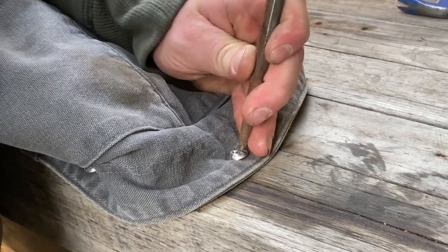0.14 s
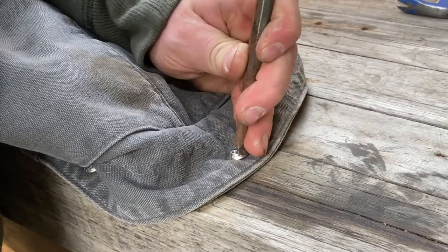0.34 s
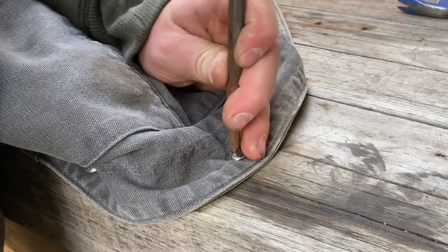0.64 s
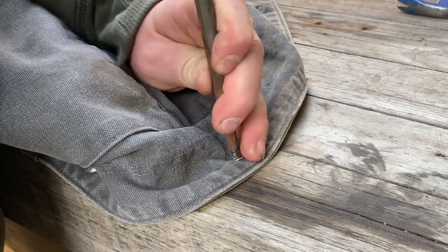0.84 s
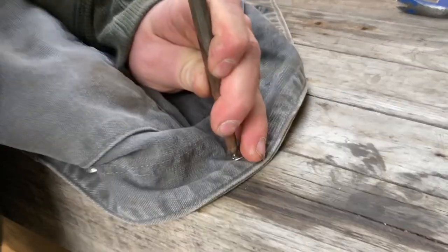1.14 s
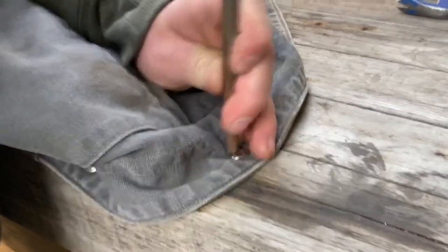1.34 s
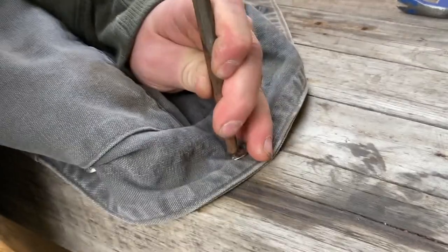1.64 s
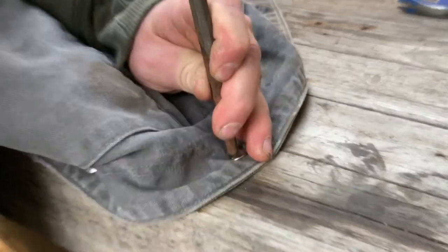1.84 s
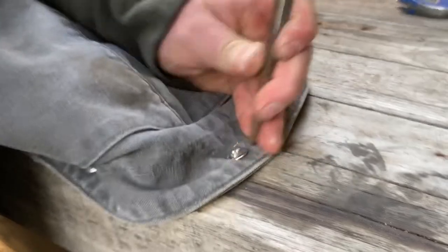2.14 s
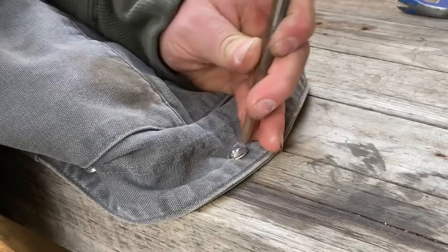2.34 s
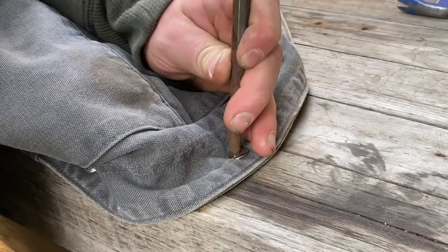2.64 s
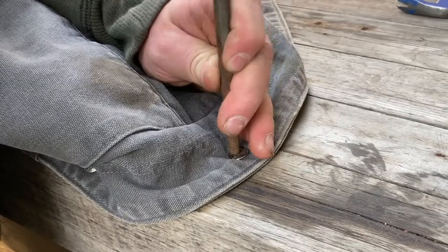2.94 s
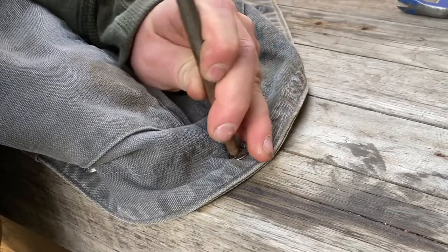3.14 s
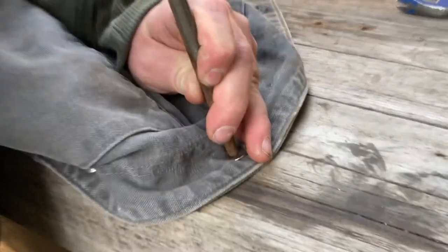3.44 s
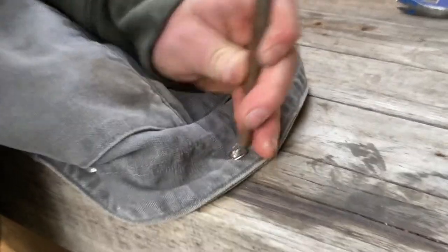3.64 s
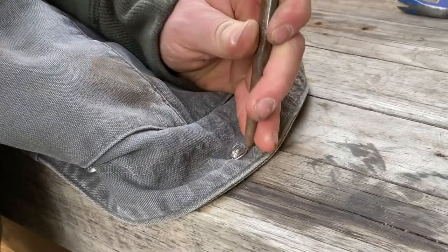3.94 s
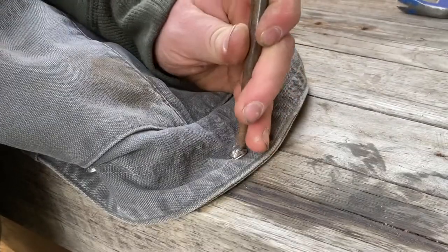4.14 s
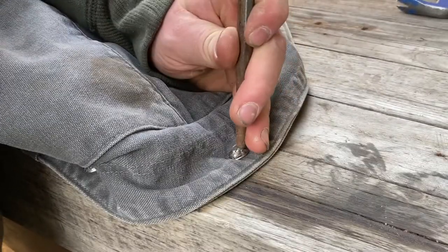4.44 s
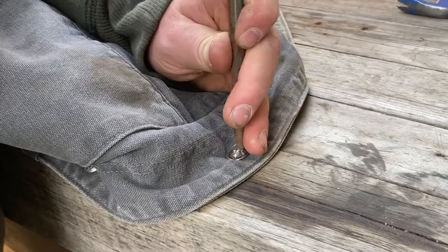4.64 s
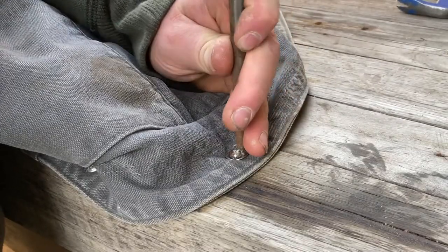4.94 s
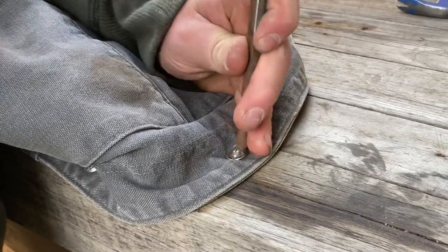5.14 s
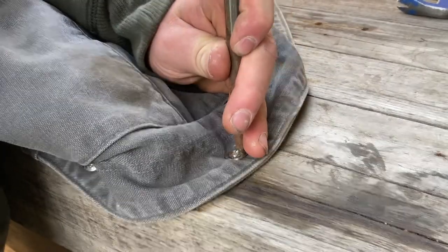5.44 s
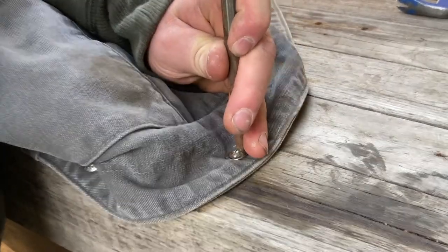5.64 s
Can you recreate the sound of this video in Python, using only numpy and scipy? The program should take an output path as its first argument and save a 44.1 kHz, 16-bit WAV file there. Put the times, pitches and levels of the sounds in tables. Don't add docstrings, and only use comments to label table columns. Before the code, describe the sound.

A quiet open-sided work space: faint far rumble and thin airy wash, with light cloth scraping at the very start and a small dull knock at 0.08 s. At 0.99 s a hammer cracks on a steel punch, bright and dry, with a low plank thud right behind it and short echoes; a light rebound and tiny rattling ticks follow around 1.12-1.2 s. More hard blows fall at 1.32, 1.70 and 1.98 s, the latter pair with fuller wooden boom. Soft finger and fabric brushes follow, with faint punch-setting ticks near 2.67 s. At 3.26 s a blow rings longest, a choked one answers at 3.51 s, and a faint tick comes at 3.75 s. A long quiet gap holds barely audible brushes. A weaker tap at 5.14 s rebounds immediately, then firm blows land at 5.45 and 5.73 s, the last the sharpest, its tail cut by the end.

```python
import sys
import numpy as np
from scipy import signal
from scipy.fft import rfft, irfft
from scipy.io import wavfile
from scipy.ndimage import uniform_filter1d

SR = 44100
rng = np.random.default_rng(int(sys.argv[2]) if len(sys.argv) > 2 else 0)


def nominal_scale(level):
    x = np.asarray(level, float) / 20
    return 10 ** x


def materialize(psi):
    bounded = np.clip(np.atleast_2d(psi).T, -1, 1)
    quanta = np.round(bounded * 32767).astype(np.int16)
    wavfile.write(sys.argv[1], SR, quanta)


N = 255339

# (frequency [Hz], density [dB per Hz])
RUMBLE_SPECTRUM = [(12, -51.5), (30, -29.5), (46, -15.5), (67, 1), (101, -1), (129, -1), (167, -10.5),
                   (215, -9), (274, -24), (370, -32.5), (409, -34), (445, -28), (600, -33), (780, -65.5),
                   (1320, -120)]
# (frequency [Hz], density [dB per Hz])
WASH_SPECTRUM = [(150, -29.5), (250, -8), (340, -17), (380, -32), (481, -17.5), (763, -18.5), (1050, -17),
                 (2710, -36.5), (7000, -52), (9100, -81), (15400, -120)]
# (frequency [Hz], density [dB per Hz])
CLOTH_SPECTRUM = [(880, -32), (1500, -5.5), (2220, -1.5), (2480, -7), (2850, -5.5), (5750, -13),
                  (13500, -23.5), (14800, -28.5), (16500, -39)]
# (frequency [Hz], coherence [-1 to 1])
AIR_COHERENCE = [(60, 0.92), (150, 1), (300, 0.3), (640, -0.08), (1400, 0.012), (3100, 0.27)]
# (time [s], level [dB])
RUMBLE_LEVEL = [(0.0, -73.5), (0.2, -76), (0.45, -65.5), (1.1, -66), (1.7, -65.5), (2.3, -71.5), (2.6, -73),
                (3.2, -70), (4.1, -66), (4.45, -69), (5.2, -68), (5.79, -64.5)]
# (time [s], rustle level [dB])
RUSTLE_LEVEL = [(0.0, -81.5), (0.37, -92), (0.56, -97), (0.69, -91.5), (1.2, -93), (1.42, -91.5),
                (1.61, -93), (1.8, -86), (2.0, -89), (2.14, -85.5), (2.3, -101), (2.8, -105.5),
                (3.43, -102), (3.5, -85.5), (3.74, -102), (4.0, -105), (5.79, -104)]
# (frequency [Hz], width [Hz], level [dB])
SCRAPE_PEAKS = [(1523, 500, 7), (3400, 1300, -11), (8095, 330, 6.5), (10200, 2000, -10)]
# (time [s], level [dB])
SCRAPE_LEVEL = [(0.0, -68), (0.012, -74), (0.07, -73), (0.1, -91)]
# (time of crack [s], level [dB], band [Hz], band [Hz])
SWELLS = [(0.992, -49.5, 7300, 3800), (1.317, -51.5, 6670, 4490), (1.703, -56.5, 3680, 2510),
          (1.983, -56.5, 8040, 3200), (3.259, -64, 6490, 3520), (3.515, -61, 7340, 3903),
          (5.136, -79, 4686, 7000), (5.452, -63.5, 2896, 7800), (5.729, -62.5, 3105, 7500)]
# (frequency [Hz], t60 [s])
SHED_DECAY = [(200, 0.53), (700, 0.083), (2000, 0.2), (5000, 0.3), (12000, 0.56), (15000, .12)]
# (frequency [Hz], level [dB])
SHED_LEVEL = [(200, -25), (700, -3.5), (2000, -10.5), (5000, -21.5), (12000, -31), (16000, -22.5)]
# (frequency [Hz], level [dB])
SHED_ABSORPTION = [(8500, 0), (8800, -24), (9500, -24), (9800, 0), (12900, 0), (13300, -34), (14400, -32),
                   (14800, -2), (15300, -2), (15800, -30)]
# (time [s], level [dB], frequency [Hz], t60 [s], overtone level [dB])
KNOCKS = [(0.077, -45.5, 334, 0.037, -21), (1.117, -60, 7800, 0.012, -33), (1.117, -64, 5780, 0.0066, -30),
          (1.119, -63.5, 2700, 0.012, -34), (1.123, -60.5, 1790, 0.022, -30), (1.161, -63, 1440, 0.037, -1),
          (1.199, -61, 1340, 0.032, 1), (1.205, -56, 1397, 0.031, -18), (1.118, -73, 4050, 0.0086, -30),
          (1.122, -62.5, 1110, 0.02, -30), (3.753, -70, 1157, 0.022, -18), (1.122, -57, 402, 0.036, -9)]
# (time [s], level [dB], frequency [Hz], t60 [s])
BRUSHES = [(0.4424, -74, 10200, 0.06), (2.1397, -75, 10500, 0.14), (2.2994, -78.5, 11360, 0.13),
           (2.4194, -79.5, 4320, 0.038), (2.5491, -72, 4050, 0.058), (4.1744, -87, 3485, 0.036),
           (4.4344, -85, 4340, 0.038), (4.7194, -87, 3740, 0.046), (3.82, -84, 10000, 0.14)]
# (time [s], crack level [dB], boom level [dB], low steel mode [Hz], treble level [dB])
TOUCHES = [
    (1.1182, -65, -53.5, 5850, 8),
    (2.6664, -63.5, -75.5, 4170, -16),
    (3.7523, -60, -66.5, 4170, -4.5),
    (5.1569, -38.5, -52, 4500, 2.5),
]
# (time [s], crack level [dB], boom level [dB], punch ring level [dB], low steel mode [Hz])
BLOWS = [
    (0.9923, -17.5, -37, -27.5, 4720),
    (1.319, -18.5, -38, -38, 4800),
    (1.7031, -19, -32, -33, 5060),
    (1.9813, -18, -33.5, -37, 5916),
    (3.258, -20, -37.5, -22, 3700),
    (3.514, -17, -34, -40, 3705),
    (5.135, -28, -44.5, -37, 4830),
    (5.454, -20.5, -37.5, -33, 4610),
    (5.7301, -16, -33, -39.5, 3200),
]
# (start [s], high steel mode [Hz], levels near 2, 4.5 and 14 kHz against 8 kHz [dB x 3])
GRIPS = [(0.9, 8510, -9, -12, -5), (1.6, 7470, -4.5, -4.5, -4.5), (3.1, 7820, -14, -2.5, 1.5),
         (5.0, 6640, -7.5, -4, -0.5), (5.3, 6740, -8.5, -7.5, -3.5)]
GRIP_HZ = [2200, 4500, 8000, 14000]
# (frequency [Hz], level [dB], t60 [s], side of the node line [+-1])
BENCH_MODES = [(55.0, -24.3, 0.244, -1), (79.2, -10.9, 0.175, 1), (105.1, -2.6, 0.105, -1),
               (133.3, -18.8, 0.4, -1), (166.1, 0.0, 0.052, 1), (193.9, -26.9, 0.4, 1),
               (224.4, -7.1, 0.118, 1), (254.4, -1.9, 0.131, 1), (269.3, -14.6, 0.166, -1),
               (295.0, -8.2, 0.088, -1), (354.2, -17.1, 0.148, -1), (432.3, -10.9, 0.083, -1),
               (489.6, -31.5, 0.261, 1), (550.1, -14.1, 0.036, -1), (687.8, -19.2, 0.038, -1),
               (36, -17, .15, 1)]
# (frequency [Hz], level against the boom [dB], t60 [s])
PLANK_MODES = [(784, -23.5, 0.12), (1098, -14.5, 0.061), (1384, -12.5, .035), (2174, -2.5, 0.022)]
# (frequency [Hz], level [dB], t60 [s])
STEEL_MODES = [(2630, -3.5, 0.019), (3200, -0.5, 0.02), (3610, -1.5, 0.026), (4050, 3.5, 0.015),
               (4970, 0, 0.0011), (6700, -5, 0.0011), (7500, -8, 0.02), (8530, 2.5, 0.012),
               (10000, 4, 0.0084), (11000, -2, 0.011), (12624, 1, 0.01), (14845, 1, 0.0047)]
# (frequency [Hz], t60 [s])
PUNCH_MODE = (10590, 0.026)
# (frequency [Hz], level [dB])
LEFT_LEAN = [(300, 0.47), (1200, 2.5), (2500, 4.5), (5000, 7), (6500, 2.6)]

AIR_DB, AIR_SHARE = -86.5, 0.3
DUCK_DB, DUCK_AT_S, DUCK_WIDTH_S, DUCK_AIR_SHARE = -9.5, 0.14, 0.04, 0.27
GRID, GRID_START, OVERLAP = 1024, 100, 430
SWELL_BROAD_DB = 6
KNOCK_SCRAPE, BRUSH_SCRAPE, BRUSH_OVER_DB = 0.055, 1, -6.5
TOUCH_HIGH_HZ, TOUCH_LOW_DB, TOUCH_TOP_DB = 7100, -8, -5
CHOKE_S, CHOKE_T60_S, SPILL_DB = 0.0025, 0.005, -19.0
RING_SPILL_DB, KNOCK_SPILL_DB = -4.0, -5.0
LINGER_DB, LINGER_T60_S = -27.0, 0.057
STEER_S = 0.36
PORT_LAG = 9.7 / SR
HISS_DB, EDGE_HZ = -101, 16600


def evened(x):
    return x / np.sqrt(np.mean(x ** 2) + 1e-20)


def peaked(x):
    return x / (abs(x).max() + 1e-20)


def read(points, hz):
    f, value = np.transpose(points)
    return np.interp(np.log(hz + 1), np.log(f + 1), value)


def course(points, t, **ends):
    return np.interp(t, *np.transpose(points), **ends)


def add(mix, s, sound):
    part = mix[..., round(s * SR):][..., :sound.shape[-1]]
    part += sound[..., :part.shape[-1]]


def ring(modes, t, wave=np.sin):
    return sum(nominal_scale(db - 60 * t / max(t60, .002)) * wave(2 * np.pi * hz * t) for hz, db, t60 in modes)


def resonate(x, hz, width, passes):
    turn = np.exp(2j * np.pi * hz * np.arange(x.shape[-1]) / SR)
    r = np.exp(-np.pi * width / SR)
    for _ in range(passes):
        x = 2 * (turn * signal.lfilter([1 - r], [1, -r], x / turn)).real
    return x


def noise(spectrum, patchy_db, size):
    frames, hz = N // (size // 4) + 5, np.fft.rfftfreq(size, 1 / SR)
    a, b, c, d, patches = rng.standard_normal((frames, len(hz), 5)).T
    patches = uniform_filter1d(patches, size=6, axis=0)
    patches = evened(uniform_filter1d(patches, size=8, axis=1))
    coherence = np.clip(read(AIR_COHERENCE, hz), -1, 1)[:, None]
    left = a + 1j * b
    right = coherence * left + np.sqrt(1 - coherence ** 2) * (c + 1j * d)
    z = np.array([left, right]) * nominal_scale(read(spectrum, hz)[:, None] + patchy_db * patches)
    return evened(signal.istft(z, nperseg=size, noverlap=size - size // 4)[1][:, :N])


def cloth_scrape(t):
    hz = np.geomspace(300, 17000, 200)
    peaks = sum(nominal_scale(db) / np.sqrt(1 + (2 * (hz - f) / width) ** 4) for f, width, db in SCRAPE_PEAKS)
    scrape = noise(list(zip(hz, 20 * np.log10(peaks))), patchy_db=2.0, size=256)
    return scrape * nominal_scale(course(SCRAPE_LEVEL, t, right=-150) + 4.5)


def background():
    t = np.arange(N) / SR
    duck_db = sum(DUCK_DB * np.exp(-((t - blow[0] - DUCK_AT_S) / DUCK_WIDTH_S) ** 2) for blow in BLOWS)
    rumble_db = course(RUMBLE_LEVEL, t) + duck_db
    cloth_db = course(RUSTLE_LEVEL, t)
    air_db = AIR_DB + AIR_SHARE * (cloth_db - cloth_db.min()) + DUCK_AIR_SHARE * duck_db
    moving = np.clip((cloth_db + 104.5) / 5, 0, 1)
    scrape = cloth_scrape(t)
    rumble = nominal_scale(rumble_db + 2.5) * noise(RUMBLE_SPECTRUM, patchy_db=1.5, size=2048)
    wash = nominal_scale(air_db + 5.0) * noise(WASH_SPECTRUM, patchy_db=0.0, size=512)
    rustle = nominal_scale(cloth_db + 6.5) * moving * noise(CLOTH_SPECTRUM, patchy_db=2.0, size=256)
    return rumble + wash + rustle + scrape


def swells():
    out = np.zeros((2, N))
    for (s, db, first_hz, second_hz), chance in zip(SWELLS, rng.standard_normal((len(SWELLS), 2, 2000))):
        lead = OVERLAP + (round(s * SR) - GRID_START - OVERLAP) % GRID
        narrow = sum(resonate(chance, hz, 180, passes=2) for hz in (first_hz, second_hz))
        broad = evened(resonate(chance, 2600, 3500, passes=3)) * np.linspace(0, 1, 2000) ** 3.0
        bands = evened(narrow) + nominal_scale(SWELL_BROAD_DB) * broad
        growth = np.sin(np.linspace(0, np.pi / 2, lead)) ** 1.3
        add(out, s - lead / SR, nominal_scale(db) * growth * bands[:, -lead:])
    return out


def shed(x):
    size = SR // 2
    taps = np.zeros((4, size))
    at = np.arange(150, size - 10, 10) + rng.integers(0, 10, (4, (size - 151) // 10))
    np.put_along_axis(taps, at, rng.choice([-1., 1.], at.shape), 1)
    hz, t, z = signal.stft(taps, SR, nperseg=256)
    t60 = np.maximum(read(SHED_DECAY, hz), .02)[:, None]
    tail = nominal_scale(-60 * t / t60) / np.sqrt(t60)
    early = nominal_scale(5.5 - 60 * t / 0.1)
    z *= nominal_scale(read(SHED_LEVEL, hz) + read(SHED_ABSORPTION, hz))[:, None] * (tail + early)
    alike = np.clip(1 - hz / 2000, 0, 1)[:, None]
    z[1::2] = alike * z[::2] + np.sqrt(1 - alike ** 2) * z[1::2]
    echoes = signal.istft(z, SR, nperseg=256)[1] / 18
    turn = 2 * np.pi * .8 * np.arange(N) / SR
    fed = np.concatenate([x * np.cos(turn), x * np.sin(turn)])
    wet = signal.oaconvolve(fed, echoes, axes=1)[:, :N]
    return wet[:2] + wet[2:]


def ticks():
    out, t = np.zeros((2, N)), np.arange(4000) / SR
    rows = [(*row, KNOCK_SCRAPE) for row in KNOCKS]
    rows += [(*row, BRUSH_OVER_DB, BRUSH_SCRAPE) for row in BRUSHES]
    for (s, db, hz, t60, over_db, scrape), chance in zip(rows, rng.standard_normal((len(rows), 2, 4000))):
        share = np.clip(scrape, 0, 1)
        body_t60 = t60 * (1 - share)
        body = ring([(hz, 0, body_t60), (1.91 * hz % EDGE_HZ, over_db, body_t60)], t)
        drive = (1 - share) * (t == 0) + share * 0.089 * chance * nominal_scale(-60 * t / t60)
        touch = signal.fftconvolve(drive, body[None], axes=1)[:, :len(t)]
        touch *= 1 - np.exp(-t / 0.00095)
        add(out, s, nominal_scale(db + 3.0) * peaked(touch))
    return out


def rattle(chance):
    t = np.arange(chance.shape[1]) / SR
    shake = chance[0] + 0.55 * chance[1:]
    bands = resonate(shake, 330, 350, passes=2) + nominal_scale(-13.0) * resonate(shake, 650, 550, passes=2)
    return evened(bands) * (1 - np.exp(-t / .006)) * nominal_scale(-25.0 * (t / .08) ** 2)


def boom(chance):
    t = np.arange(SR // 3) / SR
    modes = 0
    for (hz, db, t60, side), u in zip(BENCH_MODES, chance):
        modes = modes + np.sign(side) * ring([(hz, db + .8 * u, t60)], t, np.cos)
    return peaked(np.convolve(modes, signal.windows.hann(37))[:len(t)])


def chatter(chance, t, hz):
    z = rfft(chance * (1 - np.exp(-t / 0.00033)) * nominal_scale(-60 * t / 0.01))
    seen_late = np.where(hz > 1600, -np.exp(-2j * np.pi * hz * PORT_LAG), 1)
    z[0] += .75 * seen_late * z[1]
    z /= np.sqrt(uniform_filter1d(abs(z) ** 2, size=36, axis=1))
    return rfft(irfft(z, len(t)) * nominal_scale(-60 * np.maximum(t - .004, 0) / .012))


def punch_ring(crack_db, ring_db, low_hz, t):
    long_db = ring_db + 7.5 + .5 * min(ring_db + 30, 0)
    modes = [(PUNCH_MODE[0], long_db, PUNCH_MODE[1]), (low_hz, crack_db + LINGER_DB, LINGER_T60_S)]
    return (1 - np.exp(-t / .0005)) * ring(modes, t)


def crack(blow, grip, chance):
    s, crack_db, boom_db, ring_db, low_hz, high_hz = blow
    size = chance.shape[1]
    t, hz = np.arange(size) / SR, np.fft.rfftfreq(size, 1 / SR)
    contacts = chatter(chance[:2], t, hz)
    modes = [(f * (1 + .02 * u), db + 2.5 * v, t60)
             for (f, db, t60), u, v in zip(STEEL_MODES, *chance[2:4])]
    modes += [(low_hz, 9.0, .01), (high_hz, 6.0, .01)]
    body = nominal_scale(23.5) + rfft(ring(modes, t, np.cos))
    colour = [(500, grip[0] - 12.0), (1200, grip[0] - 4.0), *zip(GRIP_HZ, grip), (16500, grip[3] - 14.0)]
    steel = irfft(contacts * body * nominal_scale(read(colour, hz)), size)
    steel[:, -500:] = 0
    return nominal_scale(crack_db + 3.5) * peaked(steel), punch_ring(crack_db, ring_db, low_hz, t)


def strikes():
    rows = []
    for s, crack_db, boom_db, hz, treble_db in TOUCHES:
        colour = (TOUCH_LOW_DB, 0, treble_db, treble_db + TOUCH_TOP_DB)
        rows.append(((s, crack_db, boom_db, -90, hz, TOUCH_HIGH_HZ), colour))
    for blow in BLOWS:
        since, high_hz, low_db, mid_db, top_db = [grip for grip in GRIPS if grip[0] < blow[0]][-1]
        rows.append(((*blow, high_hz), (low_db, mid_db, 0, top_db)))
    return sorted(rows)


def blows():
    (steel, choked, wood), t = np.zeros((3, 2, N)), np.arange(6000) / SR
    choke = np.maximum(nominal_scale(-60 * np.maximum(t - CHOKE_S, 0) / CHOKE_T60_S), nominal_scale(SPILL_DB))
    knock = (1 - np.exp(-t / 0.0005)) * ring(PLANK_MODES, t)
    rows = strikes()
    for (blow, grip), chance in zip(rows, rng.standard_normal((len(rows), 8, 6000))):
        s, crack_db, boom_db = blow[:3]
        hit, punch = crack(blow, grip, chance)
        add(steel, s, hit + punch)
        add(choked, s, hit * choke + nominal_scale(RING_SPILL_DB) * punch)
        thud = nominal_scale(boom_db + 6.5) * boom(chance[4])
        add(wood[0], s + .0027, thud)
        add(wood[1], s + .0026, thud)
        woken = nominal_scale(boom_db + 5.0 + 0.23 * min(crack_db + 30, 0)) * knock
        add(steel, s + .001, woken)
        add(choked, s + .001, nominal_scale(KNOCK_SPILL_DB) * woken)
        add(wood, s + .003, nominal_scale(boom_db - 14.0) * rattle(chance[5:]))
    lean_db = read(LEFT_LEAN, np.fft.rfftfreq(N, 1 / SR)) * np.array([[.5], [-.5]])
    return irfft(rfft(np.array([steel, choked]) + wood) * nominal_scale(lean_db), N)


def scene():
    near, towards_walls = blows()
    return near + shed(towards_walls) + ticks() + swells() + background()


def roll_off(x):
    return signal.sosfilt(signal.butter(12, 17000, fs=SR, output="sos"), x)


def record(dry):
    hz, (left, right) = np.fft.rfftfreq(N, 1 / SR), rfft(dry)
    treble = np.sin(np.pi / 2 * np.clip((hz - 5000) / 1000, 0, 1)) ** 2
    late = -right * np.exp(-2j * np.pi * hz * PORT_LAG) * nominal_scale(-.6)
    linked = irfft(np.sqrt(1 - treble) * left + np.sqrt(treble) * late, N)
    steer = np.clip((np.arange(N) / SR - STEER_S) / .04, 0, 1)
    both = np.array([steer * linked + (1 - steer) * dry[0], dry[1]])
    both += nominal_scale(HISS_DB) * rng.standard_normal((2, N))
    both = irfft(rfft(both) * nominal_scale(-60 * np.clip((hz - EDGE_HZ) / 400, 0, 1)), N)
    return roll_off(both)


dry = scene()
out = record(dry)
materialize(out)
```